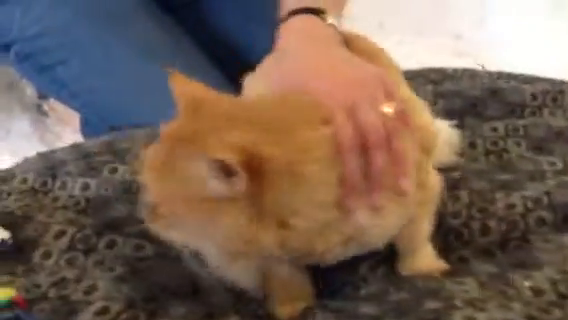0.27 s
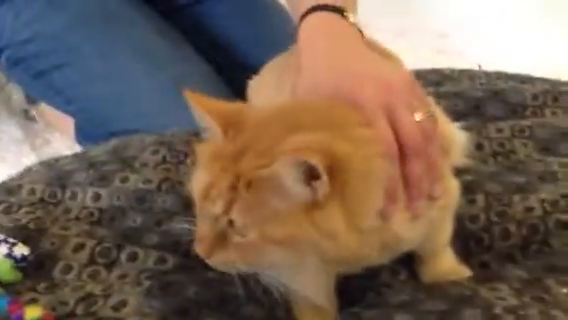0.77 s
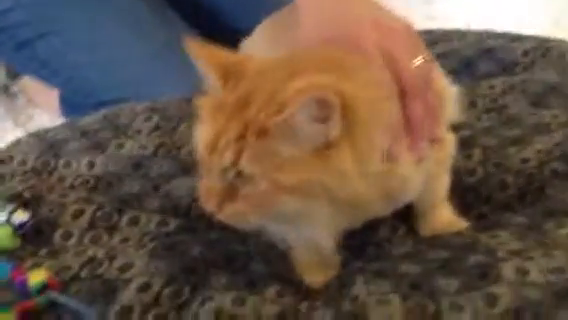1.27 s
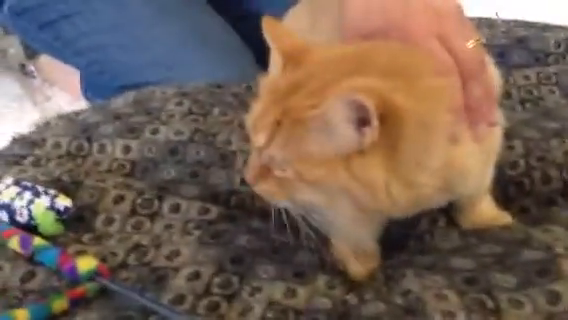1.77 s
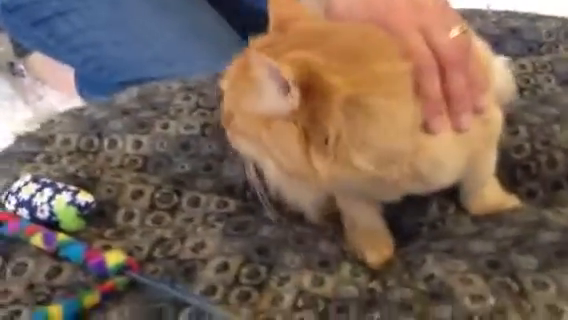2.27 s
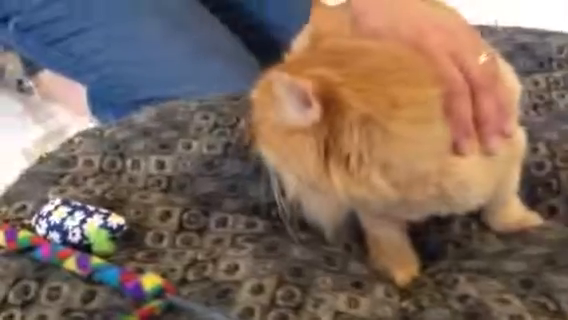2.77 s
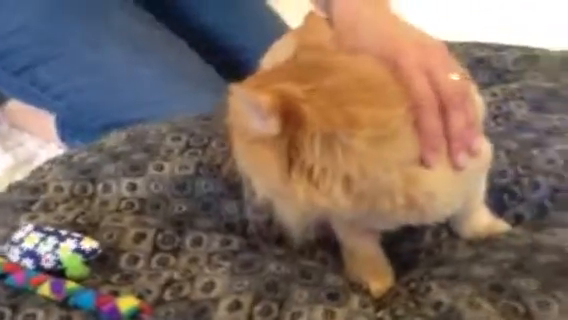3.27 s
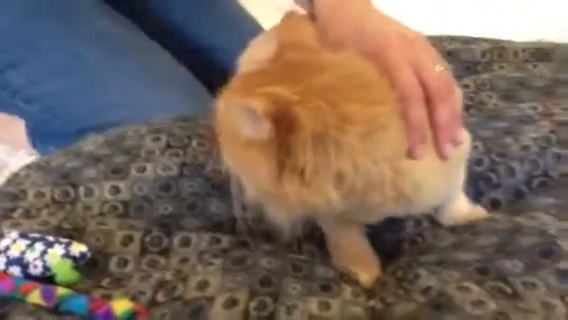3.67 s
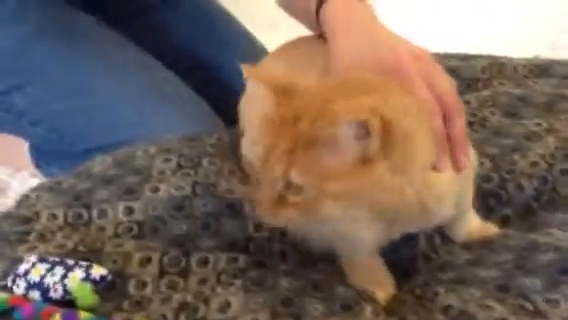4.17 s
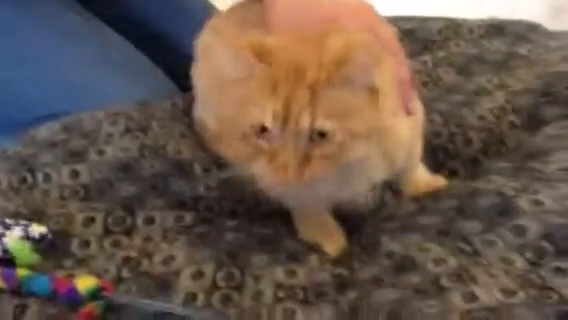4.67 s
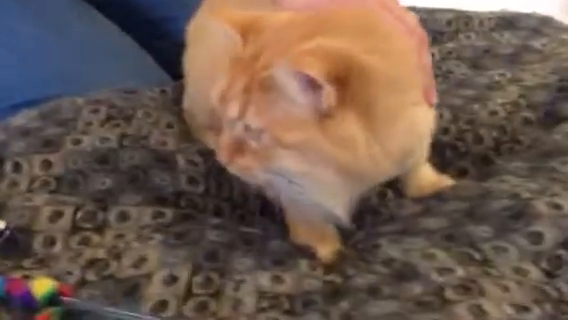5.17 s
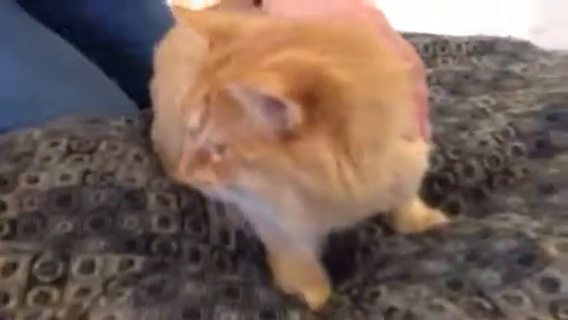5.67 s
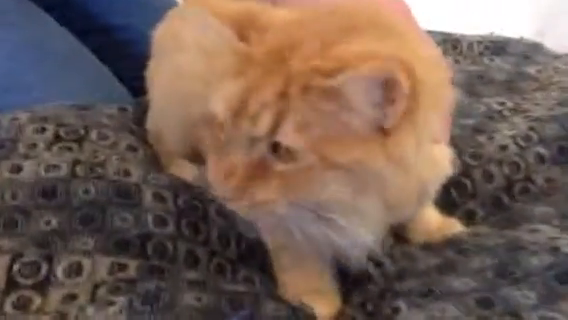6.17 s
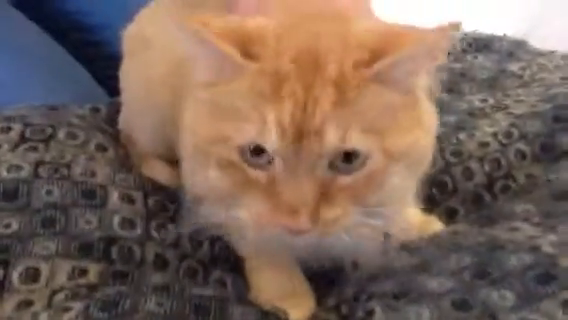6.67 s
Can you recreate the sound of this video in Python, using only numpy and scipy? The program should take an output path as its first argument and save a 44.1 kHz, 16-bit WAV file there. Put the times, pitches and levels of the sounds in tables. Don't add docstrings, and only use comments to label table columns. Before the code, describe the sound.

A small squeaky reed-like chirping pulses in separate fast bursts indoors, pauses, then returns weakly beside a crackly fabric rub; a soft fan hums throughout.

```python
import sys
import numpy as np
from scipy import signal
from scipy.fft import rfft, irfft
from scipy.io import wavfile
from scipy.ndimage import uniform_filter1d

SR = 44100
rng = np.random.default_rng(int(sys.argv[2]) if len(sys.argv) > 2 else 0)


def log_audio(samples):
    frames = np.atleast_2d(samples).T
    limited = np.clip(frames, -1, 1)
    pcm = np.round(limited * 32767).astype(np.int16)
    wavfile.write(sys.argv[1], SR, pcm)


def amplitude_ratio(level_db):
    exponent = np.asarray(level_db, float) / 20
    return 10 ** exponent


N = 305613


def at_hz(points, hz):
    return np.interp(np.log(np.maximum(hz, 1)), np.log(np.array(points)[:, 0]), np.array(points)[:, 1])


def rms_one(x):
    return x / np.sqrt(np.mean(x ** 2) + 1e-20)


def coloured(spectrum, size=N):
    hz = np.arange(size // 2 + 1) * SR / size
    white = rng.standard_normal(size)
    return rms_one(irfft(rfft(white) * amplitude_ratio(at_hz(spectrum, hz)), size))


def wobble(shape, rate_hz):
    r = np.exp(-2 * np.pi * rate_hz / SR)
    white = rng.standard_normal(shape[:-1] + (shape[-1] + 2000,))
    return rms_one(signal.lfilter([1], [1, -2 * r, r * r], white)[..., 2000:])


def resonate(x, hz, width_hz):
    r = np.exp(-np.pi * width_hz / SR)
    gain = (1 - r * r) / 2
    return signal.lfilter([gain, 0, -gain], [1, -2 * r * np.cos(2 * np.pi * hz / SR), r * r], x)


# [f/Hz, level/dB per Hz]
FAN_AIR = [(15, -74), (25, -31), (97, -21.5), (120, -5), (141, 0.5), (270, -19), (354, -24), (384, -21.5),
           (489, -22), (818, -23.5), (1700, -28.5), (1840, -27.5), (2550, -28), (14800, -41), (16000, -44)]
# [f/Hz, width/Hz, level/dB]
FAN_TONES = [(329, 3.5, -79), (355.2, 4.6, -72.5), (1825, 37, -74), (732, 11, -79), (140.8, 15.4, -64),
             (4300, 150, -79), (2160, 120, -87)]
HUM_DB, HISS_DB, FAN_DRIFT_DB = -59.5, -60.5, -0.2


def fan():
    air = coloured(FAN_AIR)
    hum = signal.sosfiltfilt(signal.butter(2, 280, fs=SR, output="sos"), air)
    drift_db = FAN_DRIFT_DB * uniform_filter1d(wobble((N,), 0.78), size=999)
    out = amplitude_ratio(HUM_DB + drift_db) * rms_one(hum) + amplitude_ratio(HISS_DB) * rms_one(air - hum)
    for hz, width_hz, level_db in FAN_TONES:
        waver_db = 2.05 * uniform_filter1d(wobble((N,), 1.6), size=99)
        out += amplitude_ratio(level_db + waver_db) * rms_one(resonate(rng.standard_normal(N), hz, width_hz))
    return out


# [t/s, level/dB]
EARLIER_TAIL = [(0, -67), (.4, -69), (1.0, -78)]


def earlier_tail():
    t = np.arange(N) / SR
    tail = coloured([(300, -10), (600, 4), (900, 4.0), (2000, -24), (4000, -2), (9000, -13)])
    return amplitude_ratio(np.interp(t, *np.transpose(EARLIER_TAIL), right=-200)) * tail


def sides(done, crest):
    return np.maximum(crest - done, 0) / crest, np.maximum(done - crest, 0) / (1 - crest)


SWELL_POWER, FAIL_POWER, LOUD_SWELL_POWER, LOUD_FAIL_POWER = 2.34, 1.793, 2.13, 2.4
FLAT_PER_DB, USUAL_DB = .02, -27.5
LOUD_LEAD = 0.85
HOLD_PER_CREST, USUAL_CREST = 2.5, .4
USUAL_S, SAG_BY_LENGTH = .034, .8


def stroke(t, row, shape):
    start_s, length_s, top_hz, top_db, crest = row
    start_sag, end_sag, start_db, end_db = shape[:4]
    done = np.clip((t - start_s) / length_s, 0, 1)
    flat = amplitude_ratio(10 * FLAT_PER_DB * (top_db - USUAL_DB))
    rising, failing = sides(done, crest)
    end_sag = end_sag * min(USUAL_S / length_s, 1) ** SAG_BY_LENGTH
    share = 1 - start_sag * rising ** (SWELL_POWER * flat) - end_sag * failing ** (FAIL_POWER * flat)
    swelling, fading = sides(done, LOUD_LEAD * crest)
    hold = np.exp(HOLD_PER_CREST * max(crest - USUAL_CREST, 0))
    sag_db = -start_db * swelling ** (LOUD_SWELL_POWER * hold)
    sag_db = sag_db - end_db * fading ** (LOUD_FAIL_POWER * hold * flat)
    return share, sag_db, failing


# [f/Hz, level/dB]
AIR = [(400, -59), (900, -4.5), (2000, 1), (5000, 1), (9000, -0.5), (12000, -12), (15000, -7)]
REED_FREE_HZ = 1720
LUMPY_DB = .5
CHIRP_SIZE = 4000


def chirp(row, shape, colour, facing, swell_db, air_db, prelude_db):
    start_s, length_s, top_hz, top_db = row[:4]
    bright_db = shape[4] * (top_db - USUAL_DB)
    start = int(start_s * SR) - 600
    t = (start + np.arange(CHIRP_SIZE)) / SR
    share, sag_db, failing = stroke(t, row, shape)
    pitch = top_hz * share
    fade_db = -9000 * np.maximum(start_s - t, 0) - 2500 * np.maximum(t - start_s - length_s, 0)
    level = uniform_filter1d(top_db + sag_db + fade_db, size=40)

    order = np.arange(1, 15)[:, None]
    facing_index = np.array([0, 1, 2, 3, 3, 4, 4] + [5] * 7)
    turn_db = np.r_[facing, 0][facing_index][:, None] + bright_db * np.minimum(order - 1, 6)
    soft_db = (.025 + .03 * failing) * (level - level.max()) * (order - 1)
    surface_db = swell_db * (.6 + 2.6 * failing) * wobble((14, CHIRP_SIZE), 80)
    partial_db = at_hz(colour, order * pitch) + turn_db + soft_db + surface_db
    partial_db -= 10 * np.log10(np.sum(amplitude_ratio(2 * partial_db), axis=0))

    jitter = (.003 + .02 * failing ** 2) * wobble((CHIRP_SIZE,), 400.0)
    phase = 2 * np.pi * np.cumsum(pitch * (1 + jitter)) / SR
    lag = .8 * order + .12 * order ** 2 + .35 * wobble((14, CHIRP_SIZE), 25.0)
    tone = np.sqrt(2) * np.sum(amplitude_ratio(partial_db) * np.cos(order * phase - lag), axis=0)
    tone *= amplitude_ratio(LUMPY_DB * (0.42 + failing) * wobble((CHIRP_SIZE,), 120.0))

    keep = np.exp(-1 / (0.0015 * SR))
    flow = signal.lfilter([1 - keep], [1, -keep], amplitude_ratio(level))
    stalled = np.maximum(flow - amplitude_ratio(level), 0)
    leak_level = amplitude_ratio(air_db + 7.1 * failing - 5.5) * flow + amplitude_ratio(-3.0) * stalled
    leak = leak_level * coloured(AIR, size=CHIRP_SIZE)

    since = t - start_s
    glide = pitch + (REED_FREE_HZ - pitch) / (1 + np.exp((since - .0003) / 0.0016))
    quiver = np.exp(-.5 * ((since + 0.001) / 0.003) ** 2) * np.sin(2 * np.pi * np.cumsum(glide) / SR)
    return start, amplitude_ratio(level) * tone + leak + amplitude_ratio(level.max() + prelude_db) * quiver


# [t/s, length/s, top f/Hz, top level/dB, crest/share of length]
PUSHES = [(0.412, 0.029, 1206, -39, 0.36), (.661, 0.043, 1567, -17, 0.34), (.895, .049, 1559, -19.5, 0.32),
          (1.406, 0.023, 1213, -40.5, 0.44), (1.588, 0.041, 1480, -23.5, 0.4),
          (1.777, 0.029, 1297, -37, 0.5), (1.948, .037, 1473, -24, 0.31), (2.604, 0.029, 1350, -29.5, 0.31),
          (2.802, 0.026, 1317, -30.5, 0.34), (2.988, 0.025, 1324, -29.5, 0.4),
          (3.786, 0.033, 1417, -23.5, 0.27), (3.987, 0.037, 1500, -18, 0.33),
          (4.214, 0.031, 1464, -20.5, 0.23), (6.259, 0.02, 1325, -28, .36), (6.640, .024, 1404, -27, 0.34)]
# [t/s, length/s, top f/Hz, top level/dB, crest/share of length]
DRAWS = [(.522, 0.04, 1117, -29.5, 0.35), (.770, 0.044, 1203, -23.5, 0.55), (0.999, .052, 1180, -26, .48),
         (1.498, 0.031, 1091, -34, 0.35), (1.689, 0.041, 1135, -30.5, 0.44),
         (1.869, 0.027, 1024, -38.5, 0.41), (2.051, 0.046, 1099, -33.5, 0.54),
         (2.706, 0.028, 1096, -31.5, .45), (2.904, 0.028, 1081, -33.5, 0.36),
         (3.093, 0.023, 969, -39.5, 0.3), (3.903, .047, 1065, -32, .68), (4.101, 0.044, 1143, -24.5, 0.61),
         (4.328, 0.032, 1078, -28, 0.6), (6.376, 0.021, 975, -39.5, 0.36), (6.579, 0.017, 1024, -38, 0.44),
         (6.751, 0.025, 1080, -34.5, 0.61)]
# [f/Hz, level/dB]
PUSH_COLOUR = [(1000, -6), (2000, -7), (3200, -8), (4500, -9), (5800, -12), (7000, -11), (8200, -11),
               (9400, -13), (10600, -22), (12500, -29), (15000, -46)]
# [f/Hz, level/dB]
DRAW_COLOUR = [(1000, -5), (2000, -4), (3200, -9), (4500, -14), (5800, -18), (7000, -22), (8200, -17),
               (9400, -17), (10600, -22), (12500, -27), (15000, -33)]
# [1st, 2nd, 3rd, 4th-5th, 6th-7th partial level/dB]
PUSH_FACING = [(-2, -2, -.5, -3, -1.5), (0.5, 0.5, -1, -1, 2), (5.5, 2, 5, 3, 3), (-4, -2, -2, -2, 1),
               (3.5, 5.5, 5.5, 1.5, 4.5)]
# [1st, 2nd, 3rd, 4th-5th, 6th-7th partial level/dB]
DRAW_FACING = [(-3, -1, 0, -1, -5), (-5, 0, -4.5, -5, -6), (1.5, 0.5, -1, 1.5, 0),
               (-3.5, -3, 2, -1.5, -3.5), (1, 0, 1, -1, -2.5)]
# [start pitch sag/share, end pitch sag/share, start level sag/dB, end level sag/dB,
# brightness/dB per partial per dB of level]
PUSH_STROKE = (.12, 0.1363, 10.1, 14.5, .11)
# [share, share, dB, dB, dB per partial per dB]
DRAW_STROKE = (.10, 0.1243, 12.5, 10, -0.05)
BURST_GAP_S = .3


def squeaks():
    out = np.zeros(N + CHIRP_SIZE)
    starts = np.sort([row[0] for row in PUSHES + DRAWS])
    bursts = starts[1:][np.diff(starts) > BURST_GAP_S]
    for row in PUSHES:
        facing = PUSH_FACING[np.searchsorted(bursts, row[0], "right")]
        start, sound = chirp(row, PUSH_STROKE, PUSH_COLOUR, facing, swell_db=1.7, air_db=-21, prelude_db=-60)
        out[start:start + CHIRP_SIZE] += sound
    for row in DRAWS:
        facing = DRAW_FACING[np.searchsorted(bursts, row[0], "right")]
        start, sound = chirp(row, DRAW_STROKE, DRAW_COLOUR, facing, swell_db=2.0, air_db=-19, prelude_db=-10.5)
        out[start:start + CHIRP_SIZE] -= sound
    return out[:N]


# [f/Hz, t60/s]
ROOM_T60 = [(800, 1.13), (2500, 1.11), (6000, 0.98), (12000, 0.67)]
# [f/Hz, level/dB]
ROOM_COLOUR = [(800, 3.8), (2500, 3.65), (6000, 2.6), (12000, 3.1)]


def room(x, near_db, far_db):
    t = np.arange(SR) / SR
    white, tail = rng.standard_normal(SR), 0
    for low in 500 * 2 ** np.arange(0, 5, .5):
        half_octave = signal.butter(2, [low, low * np.sqrt(2)], "band", fs=SR, output="sos")
        decay_db = at_hz(ROOM_COLOUR, low * 2.14) - 60 * t / at_hz(ROOM_T60, low * 1.86)
        tail = tail + signal.sosfilt(half_octave, white) * amplitude_ratio(decay_db)
    tail *= np.clip(t / 0.0094, 0, 1)
    near = rng.standard_normal(SR) * amplitude_ratio(-60 * t / 0.039) * np.clip(t / 0.012, 0, 1) ** 2
    echoes = amplitude_ratio(far_db) * tail / np.linalg.norm(tail) + amplitude_ratio(near_db) * near / np.linalg.norm(near)
    return signal.fftconvolve(x, echoes)[:N]


# [middle t/s, half length/s, thud level/dB, body level/dB, fibre level/dB]
RUSTLES = [
    (3.957, 0.023, -49, -48.5, -51),
    (6.188, 0.0073, -58, -59.5, -68),
    (6.325, 0.024, -57.5, -52.5, -74),
    (6.361, .008, -59, -51, -57),
    (6.394, 0.015, -73, -42.5, -61),
    (6.433, 0.011, -52.5, -51, -53),
    (6.453, 0.0089, -71, -68, -57),
]
# [f/Hz, width/Hz, level/dB]
RUB_MODES = [
    [(278, 204, 3), (463, 290, -22)],
    [(900, 280, 0), (1500, 81, 3.5), (2120, 290, -8), (3000, 440, -35)],
    [(4030, 700, -1), (4530, 630, 14), (5670, 600, -21), (7350, 2500, -23)],
]


def cloth():
    t, out = np.arange(N) / SR, np.zeros(N)
    sizes = amplitude_ratio(3.5 * np.minimum(rng.exponential(1, N), 4)) * rng.choice([-1, 1], N)
    slips_per_s = 7000 * amplitude_ratio(3.0 * wobble((N,), 60.0))
    slips = sizes * (rng.random(N) < slips_per_s / SR)
    for layer, modes in enumerate(RUB_MODES):
        moving = sum(amplitude_ratio(row[layer + 2]) * np.exp(-((t - row[0]) / row[1]) ** 2) for row in RUSTLES)
        rings = 0
        for hz, width_hz, db in modes:
            rings = rings + amplitude_ratio(db) * resonate(resonate(slips, hz, 2 * width_hz), hz, width_hz)
        out += moving * rms_one(rings)
    return out


# [t/s, peak level/dB]
SNAGS = [
    (3.9604, -43),
    (6.329, -41),
    (6.3474, -37),
    (6.357, -45),
    (6.364, -33),
    (6.4243, -35.5),
    (6.4315, -43),
]


def snags():
    clicks = np.zeros(N)
    clicks[[round(s * SR) for s, db in SNAGS]] = amplitude_ratio(np.array(SNAGS)[:, 1] + 22.5)
    clicks = signal.sosfilt(signal.butter(4, 6000, fs=SR, output="sos"), clicks)
    high = resonate(resonate(clicks, 4600, 2500), 4600, 2500)
    return resonate(clicks, 1660, 600) + amplitude_ratio(-8.5) * high


# [t/s, level/dB, fall/Hz per s]
QUIVERS = [
    (6.929, -47, 0),
    (6.189, -56, 25000),
]


def quivers():
    out = np.zeros(N)
    for s, level_db, fall in QUIVERS:
        t = np.arange(N) / SR - s
        cycles = (REED_FREE_HZ - 100) * t - .5 * fall * t ** 2
        out += amplitude_ratio(level_db) * np.exp(-.5 * (t / .005) ** 2) * np.sin(2 * np.pi * cycles)
    return out


def scene():
    near = squeaks() + cloth() + snags() + quivers()
    behind = fan() + earlier_tail()
    return (near + room(near, near_db=-13, far_db=-16.5) + behind)[None]


def low_pass(x):
    return signal.sosfilt(signal.butter(12, 16150, fs=SR, output="sos"), x)


def record(dry):
    thinned = signal.sosfilt(signal.butter(1, 60, "high", fs=SR, output="sos"), dry)
    mix = signal.sosfilt(signal.ellip(10, .5, 70, 15500, fs=SR, output="sos"), thinned)
    return low_pass(mix)


dry = scene()
out = record(dry)
log_audio(out)
```